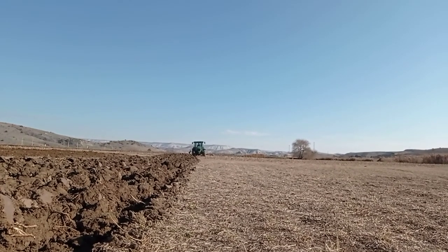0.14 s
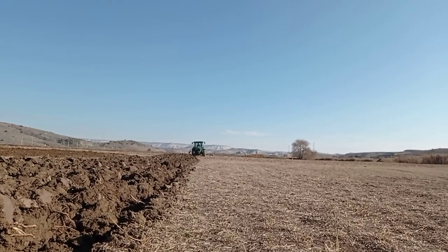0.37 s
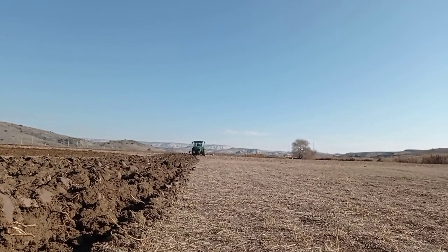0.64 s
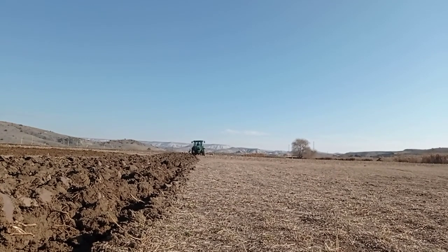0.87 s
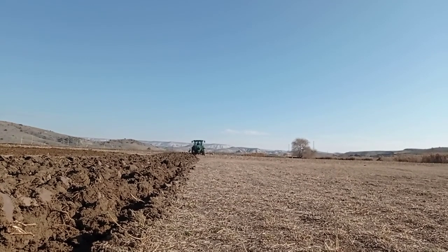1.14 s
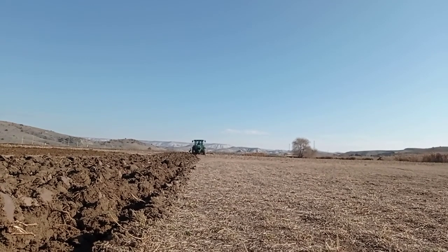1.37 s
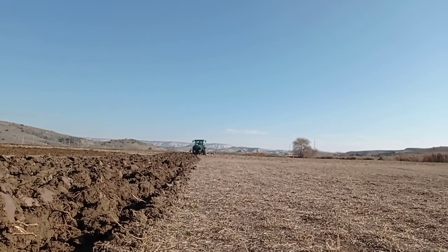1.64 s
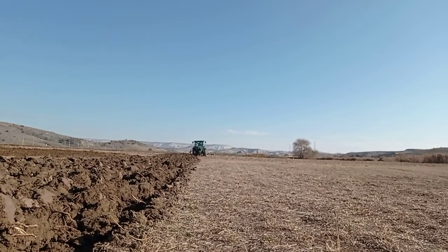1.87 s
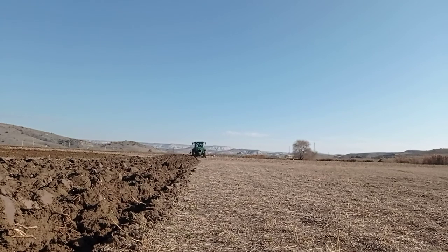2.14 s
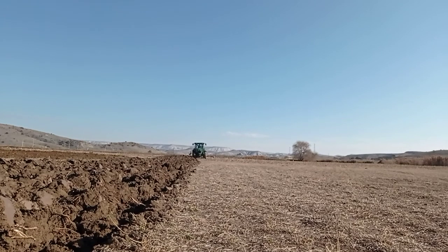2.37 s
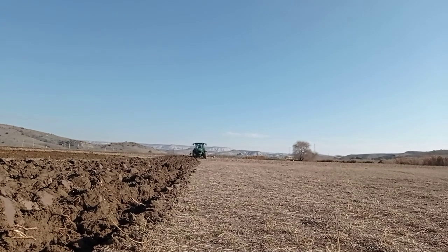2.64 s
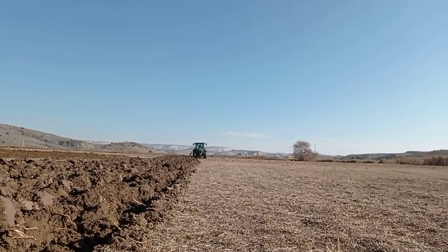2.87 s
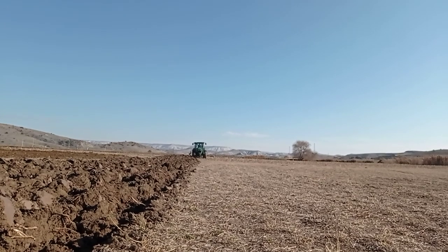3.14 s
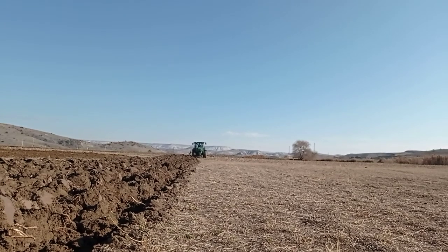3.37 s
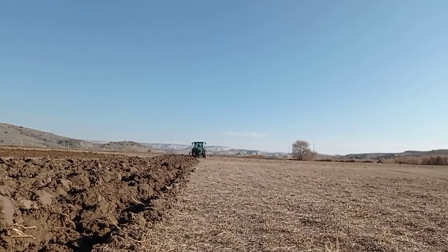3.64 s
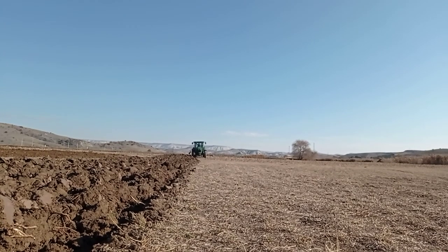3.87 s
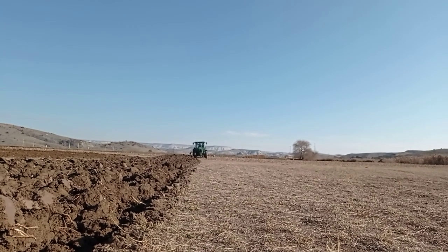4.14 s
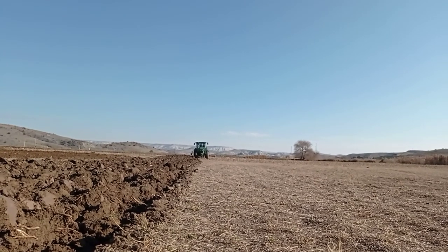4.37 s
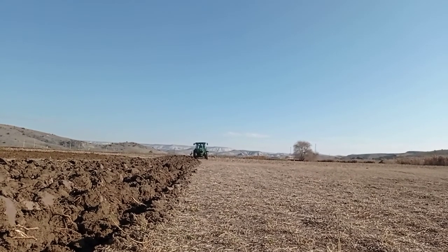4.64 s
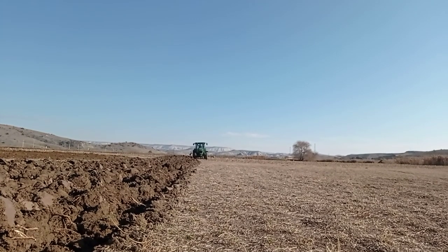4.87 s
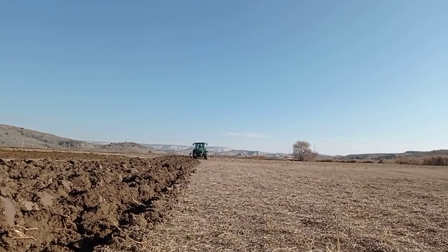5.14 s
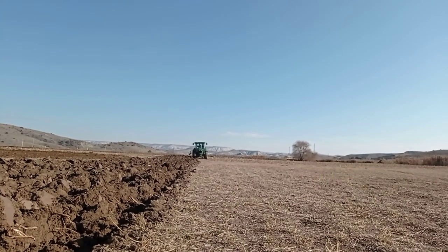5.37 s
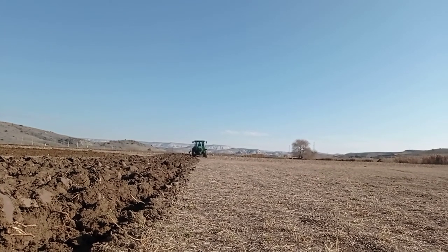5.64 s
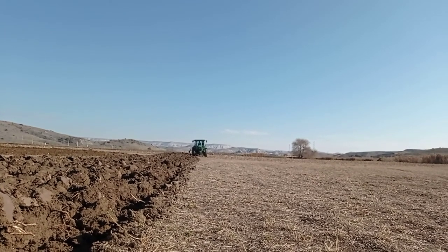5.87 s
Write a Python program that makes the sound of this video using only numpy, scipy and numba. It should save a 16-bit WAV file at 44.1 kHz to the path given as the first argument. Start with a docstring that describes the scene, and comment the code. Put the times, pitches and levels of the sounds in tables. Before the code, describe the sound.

A diesel tractor works far off in an open field, its low droning hum and faint fast clatter nearly constant throughout. Close in front, wind buffets a phone microphone with low rumble, flutter and blunt pops: a burst near half a second, a short lull after one second, then dense buffeting from about 1.6 to 5.2 seconds before it eases. Mono, dry, no echo.

```python
"""A diesel tractor hums and clatters far off across a field while wind rumbles and pops on a phone.
Exhaust: wavering tones on the firing rate. Knock: noise bursts per firing, shaped into a clatter with
narrow bands that stand out. Roar: shaped noise. Knock and roar flicker, then return late off the soil.
Wind: shaped noise, a flutter of small random wavelets and listed strong pops.
Two faint ticks and capsule hiss complete the scene."""
import sys
import numpy as np
from scipy import signal
from scipy.fft import rfft, irfft
from scipy.io import wavfile
from scipy.ndimage import uniform_filter1d
from numba import njit

SR = 44100
rng = np.random.default_rng(int(sys.argv[2]) if len(sys.argv) > 2 else 0)


def to_wav(sig):
    """Store sig (one row per channel, or 1-D mono) as 16-bit WAV at the path in sys.argv[1].

    Samples outside -1..1 are clipped; the rate is SR.
    """
    pcm = np.clip(np.atleast_2d(sig), -1, 1) * 32767
    pcm = np.round(pcm).astype(np.int16)
    wavfile.write(sys.argv[1], SR, pcm.T)  # frames by channels


def volts_from_decibels(level):
    """Turn decibel levels (scalar or array-like) into linear amplitude factors."""
    exponent = np.asarray(level, float) / 20
    return 10 ** exponent


N = 264600
T = np.arange(N) / SR

# Crank speed. Each row: time in seconds, firings per second in Hz.
FIRING_RATE_HZ = [(0, 53.24), (1.2, 53.78), (1.75, 54.47), (2.2, 53.37), (3.2, 52.53), (4.6, 52.81),
                  (5.2, 51.02), (5.7, 54.08), (6, 53.11)]
# Engine strength ahead of the ground bounce. Each row: time in seconds, knock in dB, roar in dB.
KNOCK_ROAR_DB = [(0, -52, -53), (.35, -48.5, -49), (.8, -47.5, -51.5), (1.4, -48, -50), (1.75, -52, -51),
                 (2.15, -49.5, -53), (2.4, -50, -50.5), (2.8, -50, -51), (3.2, -50.5, -48.5),
                 (3.7, -49.5, -51.5), (4.15, -46, -50.5), (4.5, -49, -47), (4.8, -53.5, -49),
                 (5.1, -46.5, -49.5), (5.3, -45.5, -45.5), (5.47, -42.5, -51), (5.65, -52.5, -49),
                 (6, -50, -48)]
# Exhaust strength. Each row: time in seconds, level in dB.
EXHAUST_LEVEL_DB = [(0, -39.5), (.9, -42), (1.6, -38), (2.5, -40.5), (3.3, -38.5), (4.5, -38.5),
                    (5.1, -41.5), (6, -36.5)]
# Exhaust tones. Each row: multiple of the firing rate, relative level in dB.
EXHAUST_TONES = [(1, -9.5), (2, -8), (3, -0.5), (4, -11), (5, -15), (7, -29), (8, -29), (11, -29),
                 (12, -29)]
# Knock of each cylinder. One relative level in dB per cylinder, in firing order.
CYLINDER_KNOCK_DB = [1.6, -1, 1.5, 2]
# Block and tinwork response to the knock. Each row: frequency in Hz, relative density in dB per Hz.
CLATTER_SPECTRUM = [(250, -27), (500, -17.5), (800, -8), (1200, -2.5), (1700, -1.5), (2200, 0), (2600, -15),
                    (3400, -9), (4200, -19), (6000, -19.5), (7500, -36), (8200, -43), (9700, -51),
                    (10300, -78.5)]
# Narrow bands that stand out in the clatter, one a thin whine near 4.5 kHz.
# Each row: frequency in Hz, width of one filter pass in Hz, level re clatter in dB.
CLATTER_PEAKS = [(1200, 90, -18), (1560, 100, -20), (1850, 170, -19), (2140, 170, -20), (2385, 90, -25),
                 (2720, 250, -24), (3000, 220, -19), (3345, 190, -16), (4544, 16, -33)]
# Fan, gears and soil. Each row: frequency in Hz, relative density in dB per Hz.
ROAR_SPECTRUM = [(250, 7.5), (500, -5.5), (800, 7.5), (1500, 6.5), (2200, 5.5), (2700, 7), (3400, 5),
                 (3700, 1), (4500, 0), (4900, -3.5), (6000, -5), (7000, -15.5), (7800, -28), (9700, -47),
                 (10300, -63), (16000, -74.5)]
# Wind strength at the port. Each row: time in seconds, flutter level in dB.
GUST_DB = [(0, -60.5), (.12, -55), (.24, -44.5), (.45, -35), (.7, -52), (.9, -59), (1.02, -41.5),
           (1.4, -60), (1.53, -51.5), (1.69, -28.5), (1.81, -48), (2.3, -35.5), (2.6, -51.5), (2.8, -47.5),
           (3.07, -28), (3.2, -39), (3.3, -32), (3.5, -44), (3.68, -30.5), (4, -40), (4.35, -44),
           (4.5, -44.5), (4.85, -33), (5.0, -44), (5.12, -35.5), (5.23, -55), (5.6, -50), (6, -59.5)]
# Rumble under the flutter. Each row: time in seconds, level in dB.
RUMBLE_LEVEL_DB = [(0.0, -57), (0.06, -40.5), (0.52, -31), (0.55, -35), (0.92, -44), (0.97, -34.5),
                   (1.27, -42.5), (1.6, -36.5), (1.65, -29.5), (1.82, -43), (1.87, -35), (2.26, -37),
                   (2.31, -28), (2.35, -36), (2.52, -35), (2.56, -45.5), (2.94, -29.5), (3.36, -33),
                   (3.49, -34.5), (3.66, -31.5), (4.31, -37), (4.93, -32), (4.98, -42), (5.13, -34.5),
                   (5.31, -51), (5.43, -37.5), (5.46, -44.5), (5.6, -39.5), (5.97, -41.5), (6.0, -47)]
# Rumble colour. Each row: frequency in Hz, relative density in dB per Hz.
RUMBLE_SPECTRUM = [(20, -34), (35, -19.5), (50, -6.5), (80, 3.5), (120, 4), (200, -3.5), (300, -10.5),
                   (500, -39.5), (1000, -81.5)]
# Strong eddies breaking on the port. Each row: centre in seconds, peak in dB, pitch in Hz, turns.
EDDY_POPS = [(0.182, -23.5, 303, 0.98), (0.205, -34, 300, 1.1), (0.232, -25, 304, 2), (.266, -24, 250, 1.5),
             (0.281, -15.5, 328, 1.3), (0.29, -19, 343, 0.99), (.313, -17, 151, 0.71),
             (.324, -21.5, 557, 0.85), (.377, -29, 300, 1.13), (.39, -19.5, 193, 1.8),
             (.412, -24, 197, 2.4), (0.428, -12, 436, 1.43), (.46, -14, 343, 1.16), (0.479, -15, 500, 1.27),
             (.5, -16.5, 261, 0.76), (.532, -22.5, 200, 1.2), (0.597, -24.5, 303, 1.3),
             (.61, -26.5, 265, 1.6), (0.733, -32.5, 298, .9), (0.861, -37, 300, 1), (.92, -37, 320, 1.4),
             (0.982, -27.5, 397, 1.07), (1.074, -32, 353, 1.1), (1.604, -31, 300, 1.1),
             (1.629, -19, 348, 1.4), (1.655, -23, 171, 1.9), (1.664, -22, 303, 1.3),
             (1.702, -11, 490, 0.86), (1.731, -16, 380, 1.1), (1.748, -24.5, 500, 1.1),
             (1.759, -19.5, 200, 1.1), (1.766, -28, 520, 1), (1.855, -23, 255, 1.33),
             (1.885, -22.5, 228, 0.73), (1.941, -16.5, 180, 1.2), (1.98, -30, 450, 0.6),
             (2.005, -31.5, 301, 1.18), (2.048, -21, 229, 1.3), (2.099, -18, 437, 1.05),
             (2.162, -30, 300, 1.3), (2.193, -19, 228, 1.07), (2.231, -27.5, 459, 0.66),
             (2.274, -17, 420, 2), (2.295, -17.5, 455, .84), (2.311, -19, 147, 0.7),
             (2.336, -26.5, 300, 1.1), (2.398, -15, 434, 1.44), (2.421, -24, 557, 1),
             (2.436, -21.5, 447, 1.2), (2.453, -26, 447, 1.1), (2.481, -22, 340, 0.93),
             (2.64, -25, 165, 1.8), (2.746, -23.5, 152, .8), (2.835, -23, 255, 1),
             (2.851, -24.5, 303, 0.79), (2.915, -21.5, 296, 1.6), (2.962, -20.5, 298, 2.1),
             (2.984, -19.5, 294, 1.2), (3.019, -25, 330, 1.2), (3.043, -15, 350, 0.69),
             (3.049, -11, 225, 0.79), (3.061, -14.5, 515, .8), (3.091, -18, 400, 1.5),
             (3.123, -15.5, 332, 1.36), (3.148, -21.5, 345, .65), (3.161, -18, 173, 1.1),
             (3.204, -20, 347, 1.16), (3.223, -18.5, 226, 1.4), (3.283, -15.5, 297, 0.89),
             (3.301, -14, 268, 1.04), (3.307, -15.5, 305, 1.6), (3.316, -18.5, 480, 2.3),
             (3.322, -23, 600, 1.4), (3.456, -21.5, 199, 1.2), (3.489, -22, 262, 1.5),
             (3.559, -21, 480, 1.34), (3.628, -17.5, 330, 1.7), (3.633, -16, 480, 1.1),
             (3.64, -15.5, 459, 1.1), (3.648, -17, 404, 1.15), (3.654, -11.5, 229, 0.8),
             (3.667, -12, 346, 0.94), (3.69, -25, 228, 0.87), (3.707, -25, 436, 1.1),
             (3.724, -16, 447, 1.2), (3.743, -21, 263, 3.3), (3.784, -20, 400, 1.3), (3.793, -17, 307, 1.8),
             (3.805, -25, 477, 1.1), (3.821, -20.5, 201, 0.88), (3.836, -25, 380, 1.5),
             (3.857, -21.5, 303, 0.58), (3.889, -19, 150, 1.3), (3.905, -19, 380, 0.84),
             (3.949, -21, 298, 1.34), (3.994, -17, 293, 1.2), (4.019, -22, 149, 1.6), (4.04, -28, 300, 1.2),
             (4.075, -19, 150, 0.77), (4.099, -28, 320, 0.99), (4.127, -17.5, 334, 0.94),
             (4.166, -19.5, 294, 0.98), (4.235, -15.5, 374, 1.02), (4.26, -23, 557, 0.93),
             (4.301, -30, 300, 1), (4.355, -31, 300, 1.1), (4.38, -21, 176, 1.3), (4.431, -16.5, 390, 1.26),
             (4.45, -20.5, 303, 1.1), (4.484, -12.5, 416, 1.34), (4.58, -30, 300, 0.98),
             (4.61, -25, 300, 1.4), (4.621, -22, 151, 1.3), (4.64, -16, 386, 1.08),
             (4.669, -20.5, 225, 1.4), (4.738, -16, 348, 1.27), (4.767, -22.5, 390, 0.89),
             (4.778, -16, 390, 1.3), (4.804, -18, 348, 1.2), (4.85, -17.5, 452, 1.1),
             (4.873, -19.5, 344, 1.2), (4.884, -27, 450, 0.98), (4.916, -21, 227, 1.4),
             (4.944, -29, 420, 1.3), (4.96, -24.5, 306, 1.2), (4.997, -28, 350, 1.1),
             (5.013, -21.5, 340, 1.1), (5.054, -29.5, 332, 0.79), (5.065, -22, 226, 1.5),
             (5.103, -26.5, 300, 1.9), (5.134, -24, 265, 1.45), (5.146, -22.5, 340, 1.7),
             (5.59, -27, 230, 0.95)]
# Faint dry ticks close by. Each row: start in seconds, peak in dB, pitch in Hz.
DRY_TICKS = [(0.837, -54, 8500), (1.478, -63, 8550)]
# Capsule hiss. Each row: frequency in Hz, relative density in dB per Hz.
HISS_SPECTRUM = [(6000, -1), (10000, 2.5), (13000, -11.5), (15000, -6)]

FIRST_FIRING = .05  # share of a firing period already run at the start
HABIT = 0.31  # share of the knock that a cylinder repeats from cycle to cycle
GROUND_MS, GROUND_SHARE, GROUND_HZ = 3.265, 0.64, 2300
AIR_TOP_HZ = 10000
GUST_REF_DB = -42.5  # a middling gust
FLUTTER_HZ, FLUTTER_OCT_PER_DB = 150, .015  # lowest pitch at a middling gust; climb with gust level
POP_PHASE_RAD, POP_SCATTER_RAD = 1.2, .8  # an eddy pushes first and pulls after
WAKE_DB, WAKE_MS, WAKE_HZ, WAKE_TURNS = -8.5, 5.76, 151, 1.58  # wake level re its pop
HISS_DB, FADE_IN_S = -89, .003


def tractor():
    """Exhaust and knock run off one crank; the roar runs on beneath."""
    firings = FIRST_FIRING + np.cumsum(curves(FIRING_RATE_HZ)[0]) / SR
    knock_db, roar_db = curves(KNOCK_ROAR_DB)
    body = volts_from_decibels(knock_db) * knock(firings) + volts_from_decibels(roar_db) * roar()
    hum = volts_from_decibels(curves(EXHAUST_LEVEL_DB)[0]) * exhaust(firings)
    return hum + ground(shimmer(body, 1.36, 16))


def exhaust(firings):
    """Tones on the firing rate; moving air makes each waver by itself, the high ones most."""
    hum = np.zeros(N)
    for multiple, db in EXHAUST_TONES:
        strength = volts_from_decibels(db + (1.2 + .25 * multiple) * walk(8.3))
        turns = multiple * firings + rng.random() + 0.02 * multiple * walk(12)
        hum += strength * np.sin(2 * np.pi * turns)
    return level(hum, 0)


def knock(firings):
    """A rounded burst of noise at every firing, a little uneven in size, clatters in the block."""
    stroke, phase = firings.astype(int), firings % 1
    cylinder = stroke % 4
    uneven_db = 1.1 * rng.standard_normal(stroke[-1] + 1)[stroke]
    size_db = np.array(CYLINDER_KNOCK_DB)[cylinder] + uneven_db
    # each cylinder rattles its own parts in much the same way every time
    samples_since_firing = np.arange(N) - np.searchsorted(stroke, stroke)
    habit = rng.standard_normal((4, 1024))[cylinder, samples_since_firing]
    rattle = HABIT * habit + np.sqrt(1 - HABIT ** 2) * rng.standard_normal(N)
    bursts = volts_from_decibels(size_db) * phase * np.exp(-phase / 0.19) * rattle
    clatter = level(colour(bursts, CLATTER_SPECTRUM), 0)
    peaks = sum(level(band(bursts, hz, width_hz), db) for hz, width_hz, db in CLATTER_PEAKS)
    return level(clatter + peaks, 0)


def roar():
    """Fan, gears and soil as steady shaped noise."""
    return level(colour(rng.standard_normal(N), ROAR_SPECTRUM), 0)


def shimmer(x, depth_db, rate_hz):
    """Each third of an octave flickers on its own in level, the treble most."""
    third = 3 * np.log2(np.arange(N // 2 + 1) * SR / N + 1)
    spectrum = rfft(x)
    out = np.zeros(N)
    for mid in range(22, 42):
        part = irfft(spectrum * np.clip(1 - abs(third - mid), 0, 1), N)
        band_depth_db = depth_db + 1.4 * max(mid - 37.5, 0)
        out += part * volts_from_decibels(band_depth_db * walk(rate_hz))
    return out


def ground(direct):
    """Soft soil returns the lower part late and combs the spectrum; the air eats the top."""
    soil = signal.butter(3, GROUND_HZ, fs=SR, output="sos")
    bounce = signal.sosfiltfilt(soil, direct)
    lag_samples = (GROUND_MS + 0.035 * walk(3.07)) * SR / 1000
    late = np.interp(np.arange(N) - lag_samples, np.arange(N), bounce)
    air = signal.ellip(6, .5, 50, AIR_TOP_HZ, fs=SR, output="sos")
    return signal.sosfilt(air, direct + GROUND_SHARE * late)


def wind():
    """Turbulence at the port: rumble, flutter and pops."""
    gust_db = curves(GUST_DB)[0]
    return volts_from_decibels(curves(RUMBLE_LEVEL_DB)[0]) * rumble() + volts_from_decibels(gust_db) * flutter(gust_db) + pops()


def rumble():
    """Low noise made lumpy by a random level, then shaped."""
    lumpy = rng.standard_normal(N) * volts_from_decibels(2.0 * walk(24.1))
    low_pass = signal.butter(4, 900, fs=SR, output="sos")
    return level(signal.sosfilt(low_pass, colour(lumpy, RUMBLE_SPECTRUM)), 0)


def flutter(gust_db):
    """Small random eddies, each a short wavelet; pitch climbs as the gust grows."""
    when, pitch, size, turn, spread = rng.random((1800, 5)).T
    climb_oct = FLUTTER_OCT_PER_DB * (gust_db[(when * N).astype(int)] - GUST_REF_DB)
    hz = FLUTTER_HZ * 2 ** (1.51 * pitch + climb_oct)
    gain = volts_from_decibels(-3.5 * np.log(1 - .98 * size))
    return level(puffs(N, when * N / SR, hz, gain, 0.4 + 1.36 * spread, 2 * np.pi * turn), 0)


def pops():
    """Strong eddies break on the port; each has a front and trails a low swing."""
    s, peak_db, hz, turns = np.transpose(EDDY_POPS)
    push, swing = rng.standard_normal((len(s), 2)).T
    phase = POP_PHASE_RAD + POP_SCATTER_RAD * push
    core = puffs(N, s, hz, volts_from_decibels(peak_db), turns, phase)
    wake = puffs(N, s + WAKE_MS / 1000, np.full(len(s), WAKE_HZ), volts_from_decibels(peak_db + WAKE_DB),
                 np.full(len(s), WAKE_TURNS), np.pi * swing)
    # the stronger the eddy, the steeper its front
    edge = puffs(N, s, 2.18 * hz, volts_from_decibels(1.447 * peak_db - 9), np.full(len(s), 1.05), phase)
    return core + wake + edge


def ticks():
    """Millisecond pings in the high treble."""
    s, peak_db, hz = np.transpose(DRY_TICKS)
    return puffs(N, s + 0.00085, hz, volts_from_decibels(peak_db), np.full(len(s), 6.), 0 * s)


def capsule_hiss():
    """Self-noise of the microphone as faint shaped noise."""
    return level(colour(rng.standard_normal(N), HISS_SPECTRUM), HISS_DB)


def level(x, db):
    """Scale to an rms level."""
    return x * volts_from_decibels(db) / np.sqrt(np.mean(x ** 2))


def curves(table):
    """Columns of a table after its time column, one value a sample."""
    s, *columns = np.transpose(table)
    return [np.interp(T, s, c) for c in columns]


def colour(x, points):
    """Filter by a (Hz, dB) spectrum."""
    hz, db = np.transpose(points)
    f = np.arange(N // 2 + 1) * SR / N + 1
    return irfft(rfft(x) * volts_from_decibels(np.interp(np.log(f), np.log(hz), db)), N)


def band(x, hz, width_hz):
    """Resonance applied twice for steep flanks, gain 1 at the centre."""
    b, a = signal.iirpeak(hz, hz / width_hz, SR)
    return signal.lfilter(b, a, signal.lfilter(b, a, x))


def walk(rate_hz):
    """Random levels held 1 / rate_hz seconds and slewed twice; spread near 1."""
    k = int(SR / rate_hz)
    held = np.repeat(rng.standard_normal(N // k + 1), k)
    return 1.16 * uniform_filter1d(uniform_filter1d(held, k), k)[:N]


@njit
def puffs(n, at, hz, gain, turns, phase):
    """Bell-shaped pressure wavelets of a few turns each, centred at the given seconds."""
    y = np.zeros(n)
    for k in range(len(at)):
        half = int(1.5 * turns[k] / hz[k] * SR)
        for j in range(-half, half):
            i = int(at[k] * SR) + j
            if 0 <= i < n:
                c = j * hz[k] / SR
                bell = np.exp(-4 * (c / turns[k]) ** 2)
                y[i] += gain[k] * bell * np.cos(2 * np.pi * c + phase[k])
    return y


def scene():
    """Open field, no walls; one channel with a short fade-in."""
    mix = tractor() + wind() + ticks()
    return (mix * np.clip(T / FADE_IN_S, 0, 1))[None]


def band_limit(x):
    """A steep low-pass at the top of the band."""
    return signal.sosfilt(signal.butter(12, 15720, fs=SR, output="sos"), x)


def record(dry):
    """The capsule hisses faintly and the phone cuts the deepest bass."""
    bass_cut = signal.butter(2, 50, "high", fs=SR, output="sos")
    mix = signal.sosfilt(bass_cut, dry + capsule_hiss())
    return band_limit(mix)


dry = scene()
out = record(dry)
to_wav(out)
```